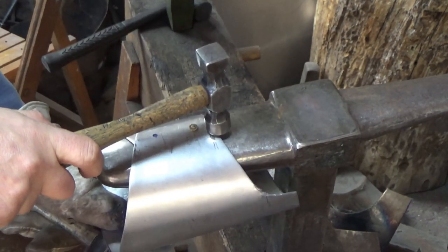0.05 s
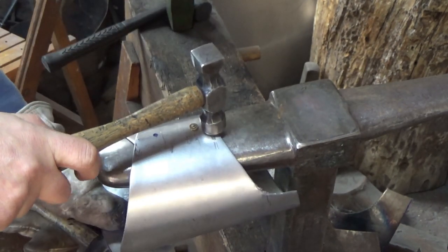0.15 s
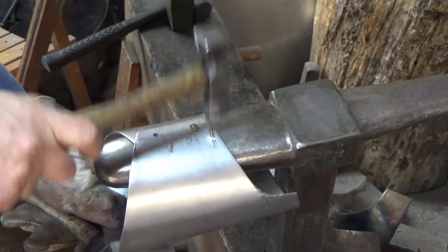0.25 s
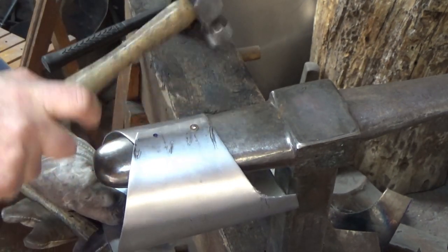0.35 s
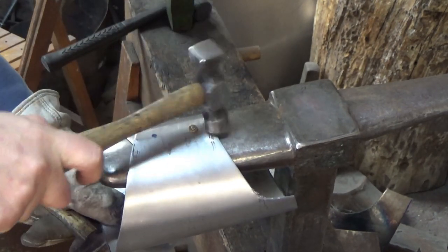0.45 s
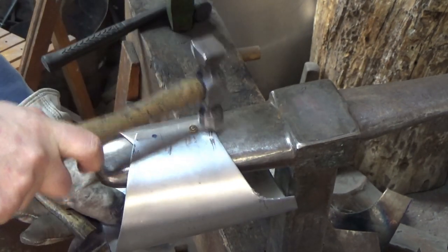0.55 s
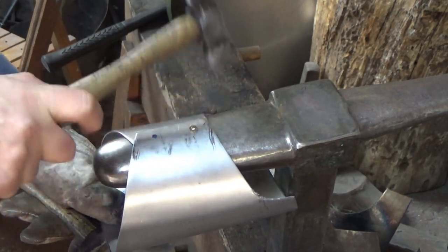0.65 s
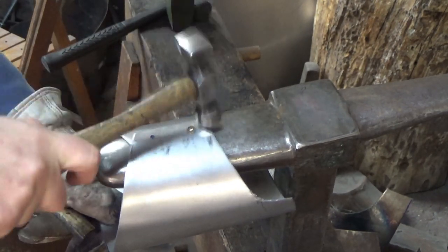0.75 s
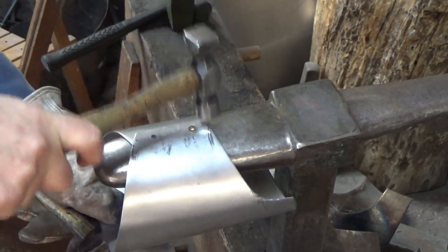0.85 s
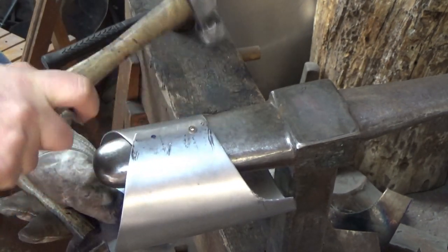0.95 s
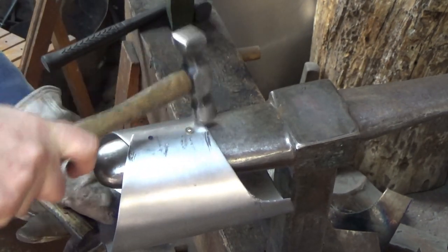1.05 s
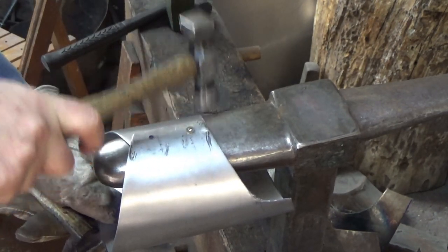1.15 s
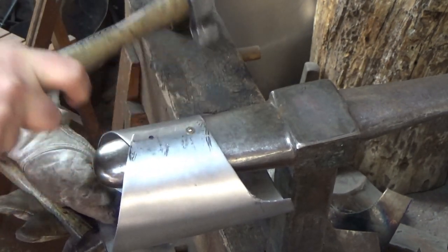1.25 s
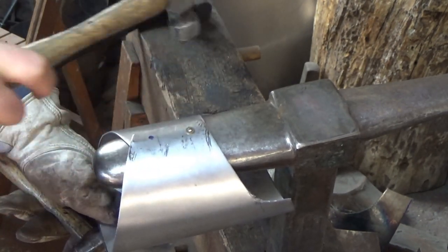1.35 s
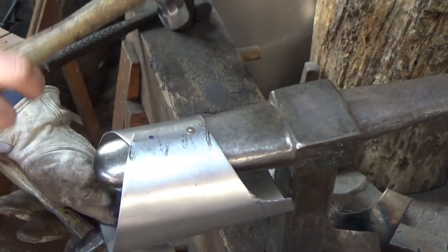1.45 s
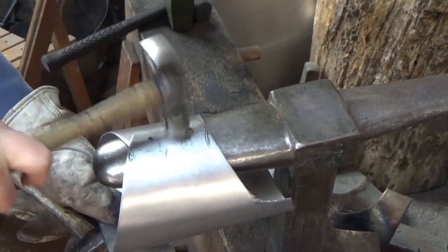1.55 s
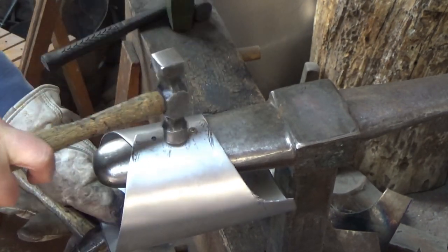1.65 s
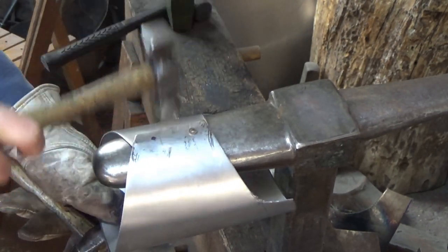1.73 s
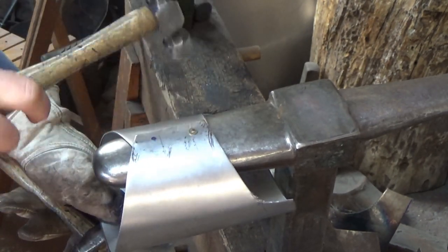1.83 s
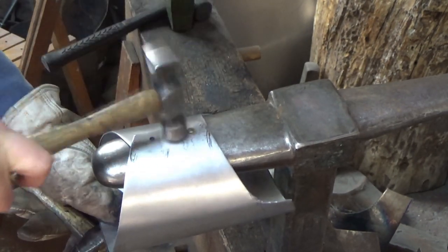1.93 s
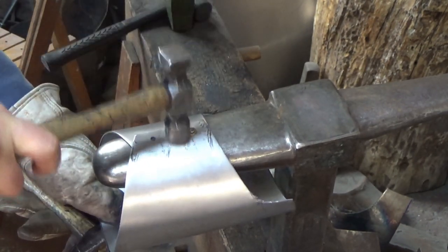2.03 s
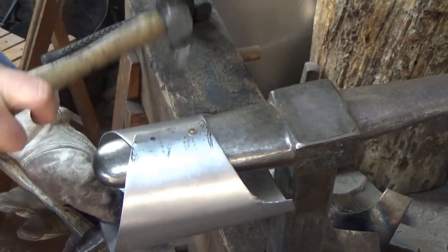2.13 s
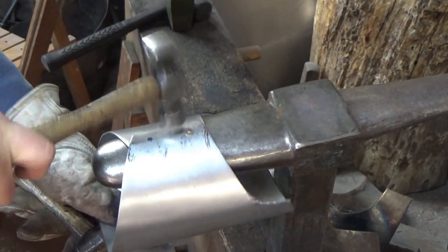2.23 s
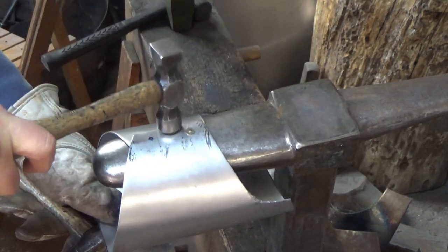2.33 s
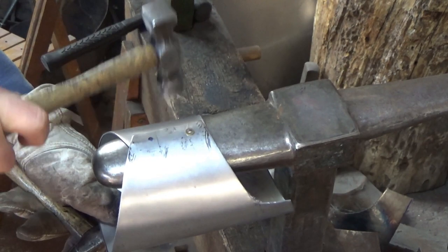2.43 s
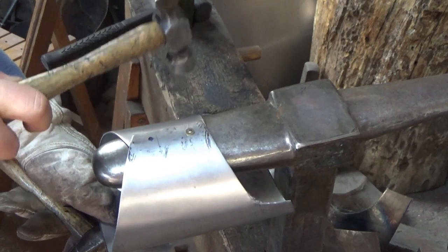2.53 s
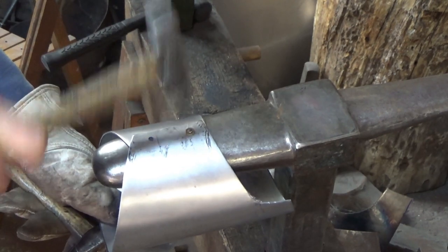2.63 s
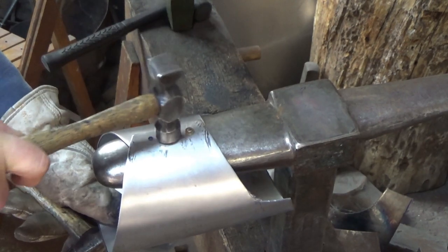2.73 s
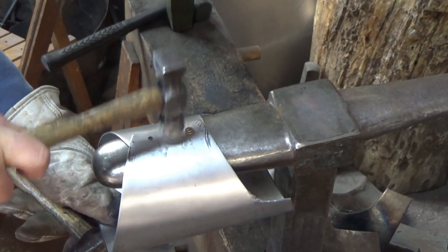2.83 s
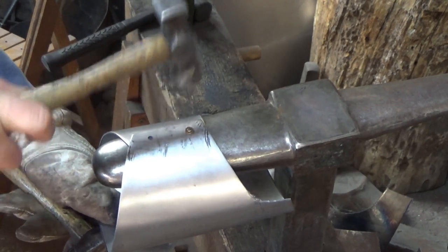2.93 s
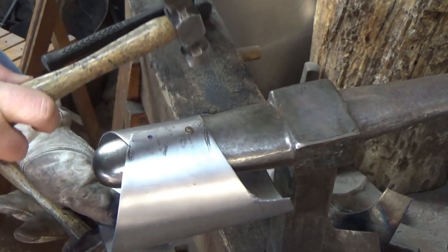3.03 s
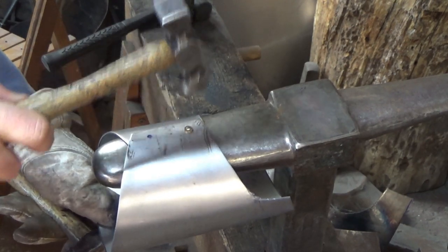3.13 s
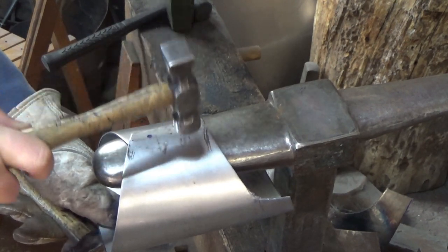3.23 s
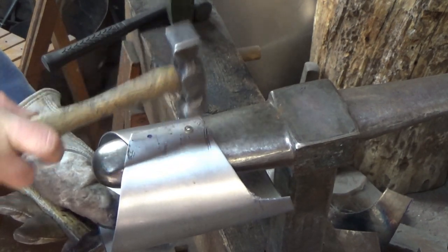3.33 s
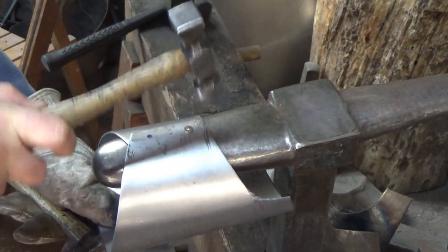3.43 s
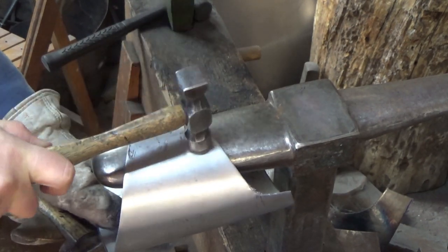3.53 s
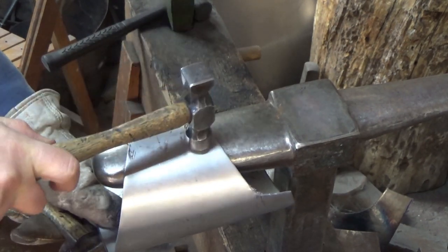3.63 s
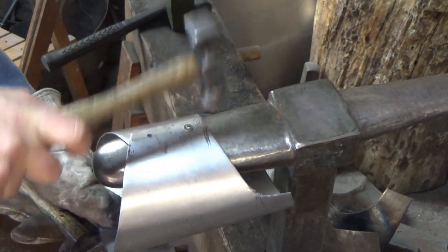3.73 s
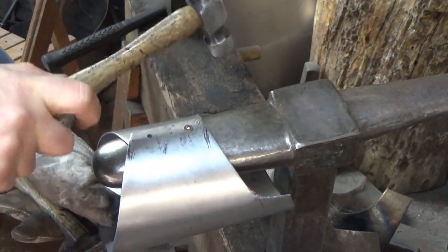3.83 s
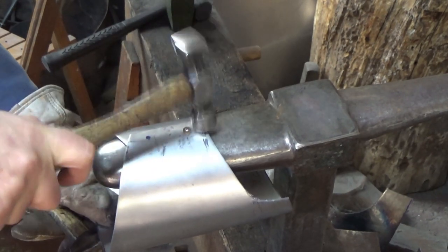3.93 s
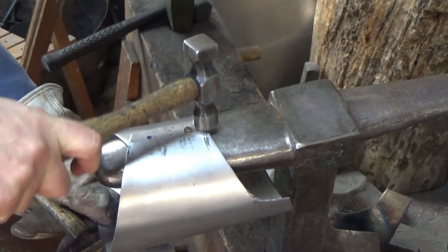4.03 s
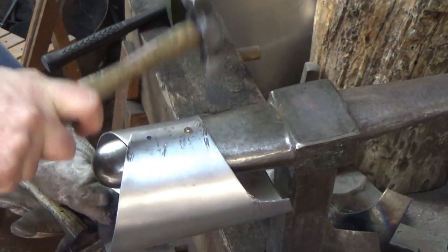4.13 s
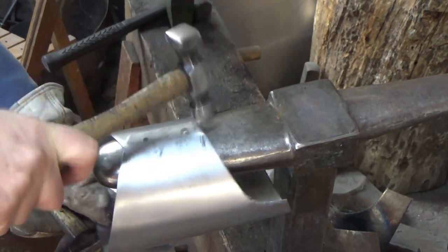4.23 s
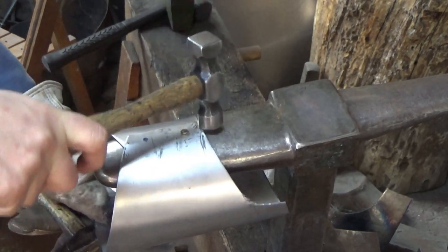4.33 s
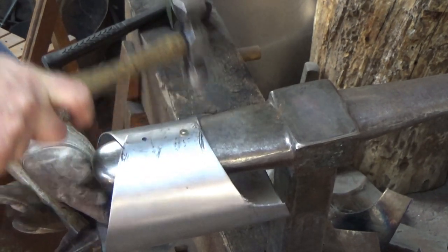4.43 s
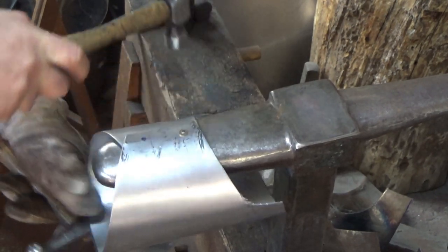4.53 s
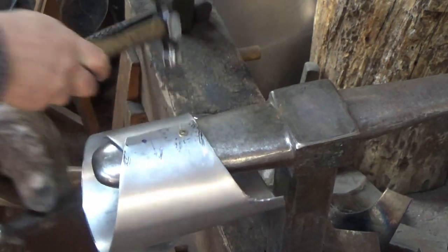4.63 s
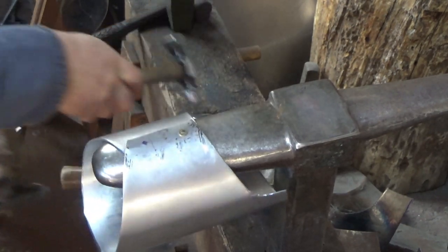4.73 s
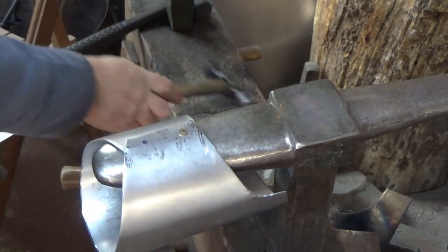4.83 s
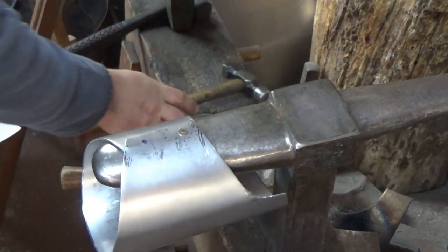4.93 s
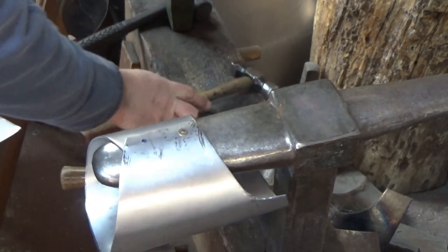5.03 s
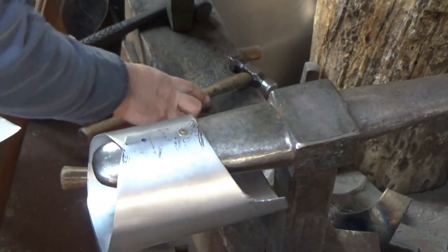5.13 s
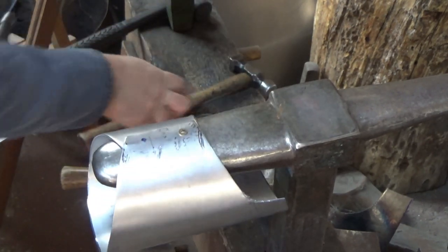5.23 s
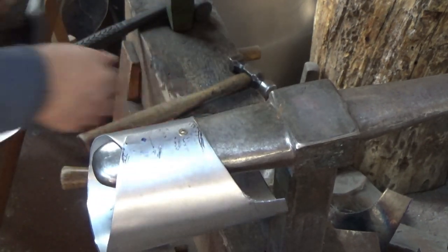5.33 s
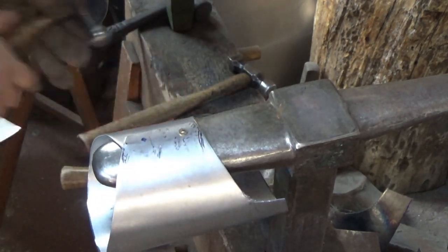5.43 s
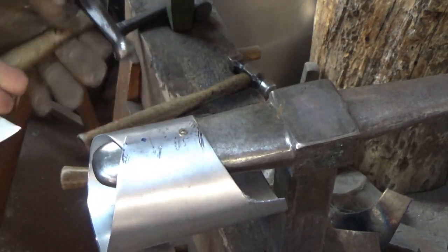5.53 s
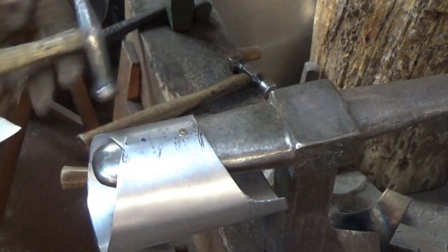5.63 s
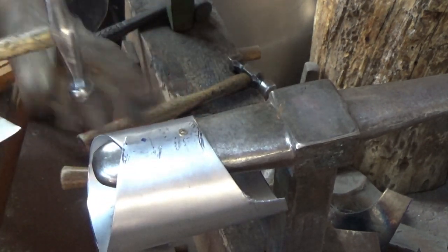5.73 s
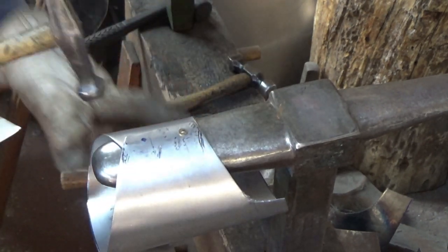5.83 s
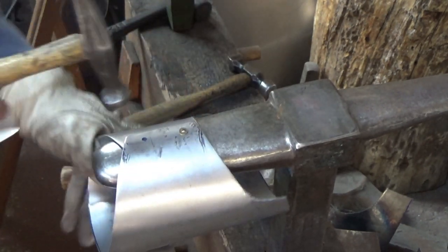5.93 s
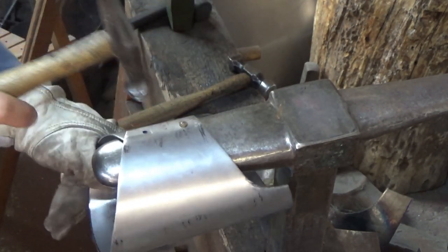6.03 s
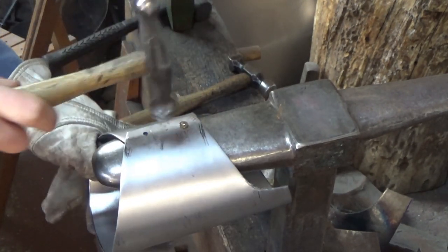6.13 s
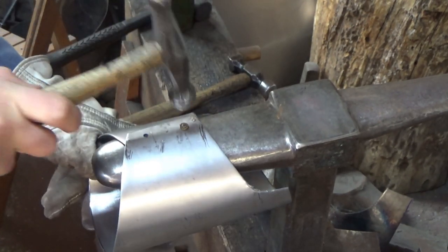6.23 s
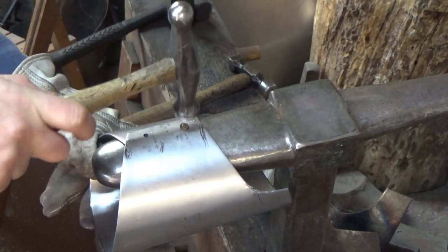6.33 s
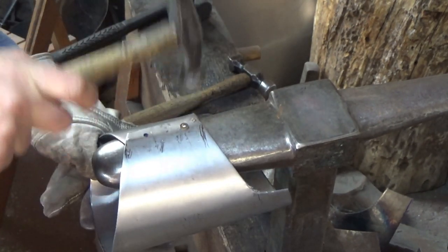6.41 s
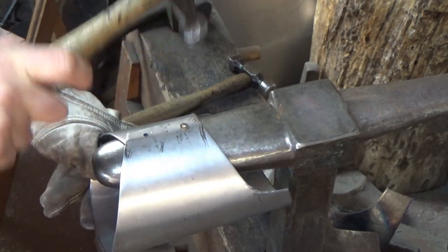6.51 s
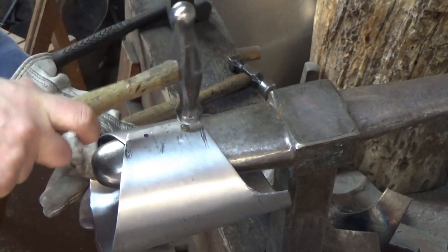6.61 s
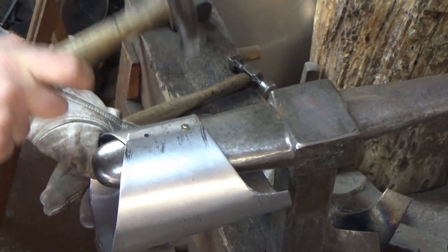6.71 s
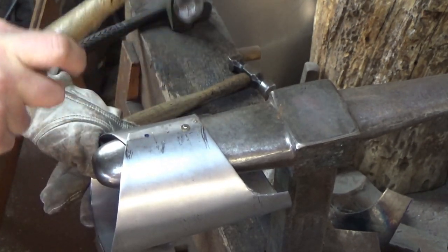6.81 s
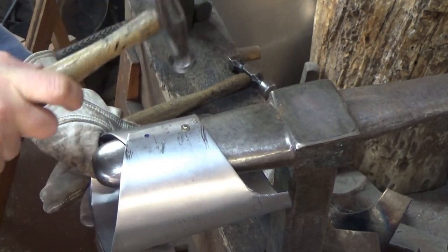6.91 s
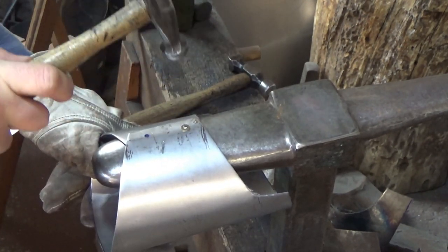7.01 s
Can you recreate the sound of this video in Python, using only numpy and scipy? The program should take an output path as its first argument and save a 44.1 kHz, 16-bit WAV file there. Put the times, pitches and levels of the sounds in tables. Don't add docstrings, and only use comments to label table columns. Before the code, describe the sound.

Close up in a small workshop, bright rough crashes of hammer on bent sheet metal come about two or three a second, irregularly spaced, each with a short rattling ring. Then the tool is put down with a hollow knock, metal and gloves scrape softly, the sheet clicks into place, and a single clang follows. Faint room hiss, low rumble and one tiny bird whistle sit behind.

```python
import sys
import numpy as np
from scipy import signal
from scipy.io import wavfile

SR = 44100
rng = np.random.default_rng(int(sys.argv[2]) if len(sys.argv) > 2 else 0)


def transcribe(signal):
    frames = np.atleast_2d(signal).T
    limited = np.clip(frames, -1, 1)
    pcm = np.round(limited * 32767).astype(np.int16)
    wavfile.write(sys.argv[1], SR, pcm)


def linear_from_db(decibels):
    return 10 ** (np.asarray(decibels, float) / 20)


N = 311785

BAND_EDGES_HZ = 25 * 2 ** np.arange(0, 9.5, .4)
# pitch_hz, likeness (0 to 1)
LIKENESS = [(60, .998), (250, .985), (500, .85), (1000, .8), (4000, .8), (7000, .86), (10000, .998)]
# pitch_hz, level_db (per Hz)
CRASH_COLOUR = [(35, -69.5), (60, -58.5), (326, -23), (403, -8.5), (615, -12.5), (834, -4.5), (983, -9),
                (1730, -12), (3180, -6), (3750, -4), (8960, 4), (14700, -14), (16500, -46)]
# pitch_hz, level_db, t60_s (time to fall 60 dB)
LOOSE_SHEET = [(591, -4.5, .16), (850, 4.5, 0.17), (1377, -8, 0.13), (1873, 0.5, 0.22), (2350, -5, 0.29),
               (3043, 2, 0.16), (3260, -9, 0.25), (3300, -10.5, 0.11), (4170, -1.5, 0.21),
               (4775, -15, 0.098), (5450, -6, .12), (5750, -0.5, 0.067), (6380, -5.5, 0.19),
               (7950, -23, 0.047), (8900, -4, 0.1)]
# pitch_hz, level_db, t60_s
HAMMER_HEAD = [(807, -5, .3), (2430, -20, .3), (2905, -7, .5), (4100, -3, .14), (4300, -3, .1),
               (5416, -5, .2), (5600, -3, .12), (7300, -10, .15), (7770, -6, .12)]
# start_s, peak_db, hardness_db, ring_db, ping_db
SET_DOWN = [
    (4.5548, -37, -5, -14, -27),
    (4.568, -36, -6, -6, -31),
    (4.7364, -19, 3.5, -15, -13.5),
    (5.015, -49, -33, -11, 0),
    (5.046, -53, -34, -22, 5),
    (5.2072, -43.5, -4.5, -13.5, -25),
]

MODE_SPREAD_DB = 5


def rms_one(x):
    return x / np.sqrt(np.mean(x ** 2) + 1e-20)


def in_time(rows):
    s, *columns = np.transpose(rows)
    t = np.arange(N) / SR
    return [np.interp(t, s, column) for column in columns]


def at_hz(points, hz):
    curve_hz, value = np.array(points)[:, 0], np.array(points)[:, 1]
    return np.interp(np.log(hz), np.log(curve_hz), value)


def clicks_at(times, sizes):
    out = np.full(N, 1e-12)
    out[np.round(times * SR).astype(int)] = sizes
    return out


def dying(power, t60):
    return signal.lfilter([1], [1, -linear_from_db(-120 / (t60 * SR))], power)


def bands(spectrum, envelope=lambda hz: 1, top_hz=20000):
    white = rng.standard_normal((2, 2, N))
    for k, (low, high) in enumerate(zip(BAND_EDGES_HZ, BAND_EDGES_HZ[1:])):
        hz = np.sqrt(low * high)
        if hz < top_hz:
            band_filter = signal.butter(2, [low, high], "band", fs=SR, output="sos")
            mid, side = signal.sosfilt(band_filter, white[k % 2] * envelope(hz))
            alike = np.clip(at_hz(LIKENESS, hz), 0, 1)
            stereo = np.sqrt(1 + alike) * mid + np.sqrt(1 - alike) * side * [[1], [-1]]
            yield linear_from_db(at_hz(spectrum, hz)) * stereo


def ringing(times, db, modes, spread_db, shorter, rattle_s=0):
    out = np.zeros((2, N))
    chance = rng.standard_normal((len(times), len(modes)))
    for (hz, mode_db, t60), luck in zip(modes, chance.T):
        force = clicks_at(times, linear_from_db(db + mode_db + spread_db * luck))
        if rattle_s:
            per_sample = 6 * np.log(10) / (rattle_s * SR)
            force = np.sqrt(dying(force ** 2, rattle_s) * per_sample) * rng.standard_normal(N)
        lean_db = MODE_SPREAD_DB * np.sqrt(1 - at_hz(LIKENESS, hz)) * rng.uniform(-1, 1)
        r = linear_from_db(-60 / (shorter * t60 * SR))
        w = 2 * np.pi * hz / SR
        tone = signal.lfilter([0, np.sin(w)], [1, -2 * r * np.cos(w), r * r], force)
        out += tone * linear_from_db(lean_db * np.array([[1], [-1]]))
    return out


def crash(times, group_db, spectrum, crack_db, crack_s, shorter):
    # pitch_hz, t60_s
    shop_echo = [(110, 0.48), (520, 0.34), (2100, 0.34), (6100, 0.27), (11000, 0.19), (15000, 0.11)]
    group_borders = [1300, 7000]
    centre = np.sqrt(BAND_EDGES_HZ[1:] * BAND_EDGES_HZ[:-1])
    power = linear_from_db(2 * at_hz(spectrum, centre)) * np.diff(BAND_EDGES_HZ) * 2 / SR
    group = np.searchsorted(group_borders, centre)
    kicks = [clicks_at(times, linear_from_db(2 * db) / power[group == g].sum()) for g, db in enumerate(group_db)]
    cracks = [linear_from_db(2 * crack_db) * dying(kick, crack_s) for kick in kicks]

    def envelope(hz):
        g = np.searchsorted(group_borders, hz)
        return np.sqrt(cracks[g] + dying(kicks[g], shorter * at_hz(shop_echo, hz)))
    return sum(bands(spectrum, envelope))


def background():
    # pitch_hz, level_db (per Hz)
    hiss_colour = [(15, -20.5), (30, -9.5), (70, -10), (200, -12.5), (900, -18), (2000, -26), (5000, -32.5),
                   (10000, -36), (16000, -50)]
    # pitch_hz, level_db (per Hz)
    rumble_colour = [(30, -23), (65, 0), (80, -11), (100, 4.5), (135, 0), (220, -27.5)]
    # start_s, level_db
    bustle = [
        (0, 8),
        (.6, 8),
        (1.3, 5),
        (2.2, 4),
        (3.2, -2),
        (4.1, -0.5),
        (5.4, 0.5),
        (6.2, 1),
        (7.07, 4),
    ]
    bustle_db, = in_time(bustle)
    hiss = rms_one(sum(bands(hiss_colour)))
    rumble = rms_one(sum(bands(rumble_colour, top_hz=250)))
    return linear_from_db(-63.5 + bustle_db) * hiss + linear_from_db(-74 + 2.2 * bustle_db) * rumble


def bird():
    # start_s, end_s, from_hz, to_hz, level_db
    chirp = (3.26, 3.36, 4130, 4230, -73)
    start, end, from_hz, to_hz, db = chirp
    u = np.clip((np.arange(N) / SR - start) / (end - start), 0, 1)
    swell = np.sqrt(np.sin(np.pi * u) + 1e-12) * (u < 1)
    pitch_hz = from_hz + (to_hz - from_hz) * u
    return linear_from_db(db) * swell * np.sin(2 * np.pi * np.cumsum(pitch_hz) / SR)


def slide():
    # loudest_s, level_db, build_up_s, dying_s
    drags = [
        (0.22, -50, .02, 0.099),
        (0.41, -55.5, 0.063, 0.073),
        (5.53, -59.5, 0.17, .03),
        (5.7, -53, 0.23, 0.53),
        (6.052, -40.5, 0.078, .012),
    ]
    # pitch_hz, level_db (per Hz)
    rustle_colour = [(180, -29), (300, -7.5), (814, -2.5), (930, -16), (978, -9.5), (4230, -9),
                     (16000, -22.5)]
    depth_db = 21.5
    t = np.arange(N) / SR
    levels = []
    for s, db, rise, fall in drags:
        distance = np.where(t < s, (s - t) / rise, (t - s) / fall)
        levels.append(db - depth_db * distance)
    level = np.max(levels, axis=0)
    catches = rng.exponential(1, N) * (rng.random(N) < 400 / SR)
    grain = np.sqrt(1 + .2 * dying(catches, .03))
    return rms_one(sum(bands(rustle_colour, lambda hz: grain))) * linear_from_db(level - 4.0)


def bench():
    # start_s, peak_db, head_ring_db
    thuds = [
        (4.914, -9.5, -16),
        (4.933, -51, -26),
        (5.017, -27, -40),
        (5.032, -26.5, -45),
        (5.095, -37, -44),
        (5.221, -31, -42),
        (5.261, -40, -27),
        (5.308, -39, -34),
        (5.358, -49.5, -40),
    ]
    # pitch_hz, level_db, t60_s
    bench_tones = [(217, -21, 1.55), (305, -16.5, 2.03), (393, -12, 0.18), (543, -15, 0.085),
                   (627, -12.5, 0.8), (830, -36, 2.3), (856, -2, 0.27), (1060, 1.5, 0.14)]
    # pitch_hz, level_db (per Hz)
    knock_colour = [(35, -57), (60, -31.5), (566, 4.5), (1060, -11.5), (1280, -21.5), (2710, -34),
                    (2970, 0.5), (3190, -33.5), (8510, -37), (16000, -57.5)]
    s, db, ring = np.transpose(thuds)
    groups = [db - 11.5, db - 24.5, db - 35]
    knock = crash(s, groups, knock_colour, crack_db=-5.5, crack_s=.03, shorter=0.84)
    wood = ringing(s, db - 17.5, bench_tones, spread_db=-1.5, shorter=0.58, rattle_s=0.02)
    steel = ringing(s, db + ring, HAMMER_HEAD[1:3], spread_db=-1.5, shorter=0.9)
    return knock + wood + steel


def head():
    # pitch_hz, level_db, t60_s
    laid_head = [(3850, -2, .15), (4200, -4, .2)]
    s, db, hard, ring, ping = np.transpose(SET_DOWN)
    long_ring = ringing(s, db + ring + 3.5, HAMMER_HEAD[:3], spread_db=0, shorter=.8)
    answer = ringing(s, db + .4 * hard - 16, LOOSE_SHEET[2:6], spread_db=2.0, shorter=.3, rattle_s=.2)
    bright = ringing(s, db + ping + .4 * hard, HAMMER_HEAD[3:], spread_db=.8, shorter=1.25)
    dull = ringing(s, db + ping - .4 * hard - 12, laid_head, spread_db=1, shorter=1)
    return long_ring + answer + bright + dull


def crowd():
    count = 44
    pitches = np.geomspace(1400, 10500, count) * linear_from_db(rng.normal(0, .12, count))
    return [(hz, at_hz(CRASH_COLOUR, hz) - 1.2 * np.log2(hz / 1400) + 8, .13) for hz in pitches]


def taps():
    # start_s, peak_db, hardness_db, ring_db
    nudges = [(0.424, -30.5, -13, -20.5), (3.026, -46, -1.5, -17), (3.3962, -67, -15.5, -0.5),
              (4.476, -33.5, -3, -14), (5.6266, -56, 0, -5), (5.6708, -49.5, -20, -4.5),
              (5.972, -49.5, -2, -4), (6.0062, -59, -2, -8), (6.03, -46, 10, -4.5),
              (6.052, -25.5, -5, -6.5), (6.07, -25, -6.5, -11.5), (6.0835, -44, -22, -1),
              (6.1518, -34.5, 6, -7), (6.1658, -21, -2, -8.5), (6.2587, -45.5, -2.5, -9.5),
              (6.339, -45, -9, -19.5), (6.4744, -44.5, -13.5, -13), (6.551, -52, -10, -18)]
    # start_s, peak_db
    bounces = [
        (0.0024, 2.5),
        (0.0128, 0.5),
        (0.0588, -15.5),
        (0.0987, -17.5),
        (0.1178, -19),
        (0.1331, -16.5),
        (0.142, -39),
        (0.1804, -28),
    ]
    # pitch_hz, level_db, t60_s
    pinned_sheet = [(553, -6.5, 0.42), (1846, -5, 0.21), (3000, -3, 0.095), (3925, -19, 0.1),
                    (4104, -1, 0.11), (6160, -1.5, 0.085), (7140, -6.5, 0.11), (8100, -11, 0.02),
                    (8800, -4, 0.11), (8700, 1.5, 0.082), (9980, -0.5, 0.077), (12300, -5, .08)]
    clatter = [(s, db, 0.5, -5) for s, db in bounces]

    s, db, hard = np.transpose([row[:3] for row in nudges + SET_DOWN + clatter])
    lows = np.where(s < .2, -8.5, 1.5 - 0.1765 * (db + 40))
    groups = np.array([db + lows, db, db + hard]) - 20.5
    out = crash(s, groups, CRASH_COLOUR, crack_db=7.0, crack_s=0.0061, shorter=0.99)

    s, db, hard, ring = np.transpose(nudges)
    high_db = db + ring + 0.51 * hard - 19.5
    out = out + ringing(s, high_db, crowd(), spread_db=6.0, shorter=0.31, rattle_s=.02)
    out = out + ringing(s, db + ring - 3, LOOSE_SHEET, spread_db=2.0, shorter=.45, rattle_s=.09)

    s, db, hard, ring = np.transpose(clatter)
    return out + ringing(s, db + ring - 3, pinned_sheet, spread_db=2.0, shorter=.33, rattle_s=.035)


def blows(force_db=8):
    # start_s, peak_db, seat_db (how well the sheet sits on the
    # horn), boom_db
    strikes = [(0.46, -16, 6, -8), (0.5006, -14, 3, -23), (0.7773, -10, 5, -10), (1.0681, -12, 4.5, -9.5),
               (1.5818, -9, 5.5, -9.5), (1.9537, -14, 6, -9.5), (1.9854, -18, 3, -18.5),
               (2.266, -12, 3.5, -15.5), (2.7072, -12.5, 8, -11.5), (3.5432, -14.5, 7, -14),
               (3.9585, -16.5, 4.5, -12), (4.2711, -17.5, 2, -13), (6.6253, -17.5, 2, -5.5)]
    # pitch_hz, level_db, t60_s
    sheet_tones = [(410.5, -5, 0.14), (496.5, -13, 0.3), (570, -3.5, 0.2), (812.5, 0.5, 0.22),
                   (865, -3.5, 0.27), (936, -2.5, 0.19), (3100, -9.5, .12)]
    # pitch_hz, width_hz, top_db
    clang_tones = [(1890, 40, -6), (2420, 30, -7), (3180, 200, -2), (3500, 35, -3), (4330, 110, -1),
                   (4710, 40, -3), (5400, 130, -1), (5810, 30, 1), (6620, 90, -2), (7800, 90, -1),
                   (8690, 30, 2), (8850, 250, 0), (9400, 100, -1)]
    # pitch_hz, level_db, t60_s
    anvil_tones = [(806, 2, .45), (1880, -4, .4), (3170, -1, .45), (4300, 0, .45), (5450, -3, .4)]
    s, db, seat, boom = np.transpose(strikes)
    db = db + force_db

    luck = rng.random((len(s), 2, 4))
    delay = np.c_[0 * s, .008 + .09 * luck[:, 0]]
    loss = np.c_[0 * s, -5.0 - 230 * delay[:, 1:] - 6.0 * luck[:, 1]]
    slaps_s = (s[:, None] + delay).ravel()
    groups = [(level[:, None] + loss).ravel() for level in (db + boom, db, db + seat)]
    broad = crash(slaps_s, groups, CRASH_COLOUR, crack_db=-6.5, crack_s=0.09, shorter=0.83)

    ring_db = db + 7 - 0.86 * seat - 6.0
    modes = ringing(s, ring_db, sheet_tones, spread_db=0.5, shorter=0.41, rattle_s=0.3)
    thump = ringing(s, -44 + 1.1 * seat, [(70, 0.015, 0.056)], spread_db=4, shorter=1)

    shared = [(hz, top + 20 * np.log10(1 + width / 30), 2.2 / (width + 30)) for hz, width, top in clang_tones]
    clang = ringing(s, db - 2, shared, spread_db=2.5, shorter=1, rattle_s=.24)
    streaks = ringing(s, db - 15, crowd(), spread_db=4.0, shorter=0.7, rattle_s=0.18)
    anvil = ringing(s, db - 34.5, anvil_tones, spread_db=5.0, shorter=1, rattle_s=.05)
    return broad + modes + streaks + clang + anvil + thump


def scene():
    return background() + bird() + slide() + bench() + head() + taps() + blows()


def low_pass(x):
    return signal.sosfilt(signal.butter(12, 16860, fs=SR, output="sos"), x)


def record(dry, knee_db=-24, share=0.59, release_db_s=400, attack_s=0.0026):
    pole = np.exp(-1 / (attack_s * SR))
    power = signal.lfilter([1 - pole], [1, -pole], np.mean(dry ** 2, 0))
    level = 10 * np.log10(power + 1e-12)
    ramp = release_db_s * np.arange(N) / SR
    held = np.maximum.accumulate(level + ramp) - ramp
    over = np.maximum(held - knee_db, 0)
    ahead = int(0.013 * SR)
    over = np.maximum(over, np.r_[over[ahead:], np.zeros(ahead)] - over)

    mid = dry.mean(0)
    side_filter = signal.butter(1, 251, "high", fs=SR, output="sos")
    side = signal.sosfilt(side_filter, dry[0] - dry[1]) / 2
    stereo = np.array([mid + side, mid - side])

    x = .68 * np.tanh(stereo * linear_from_db(-share * over) / .68)
    x = signal.sosfilt(signal.cheby2(12, 75, 16700, fs=SR, output="sos"), x)
    x = signal.sosfilt(signal.butter(1, 45, "high", fs=SR, output="sos"), x)
    return low_pass(x)


dry = scene()
out = record(dry)
transcribe(out)
```